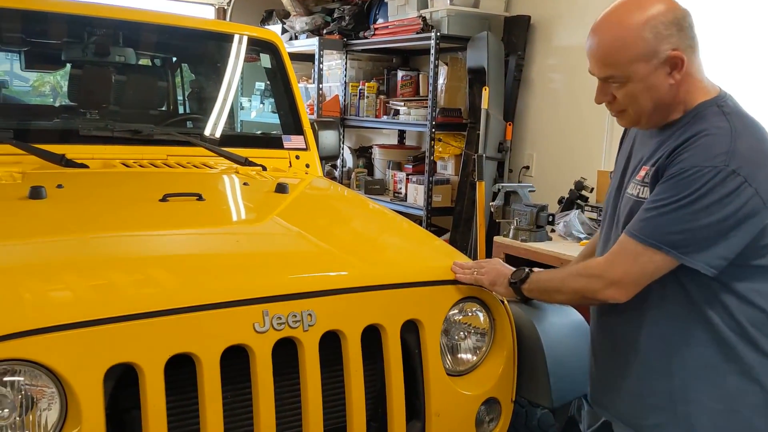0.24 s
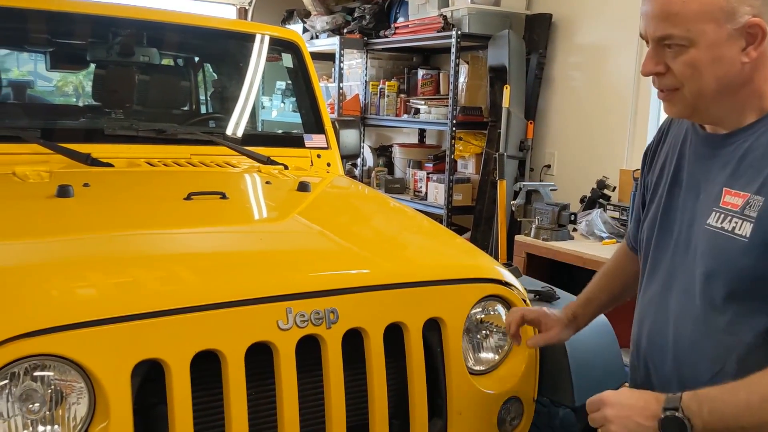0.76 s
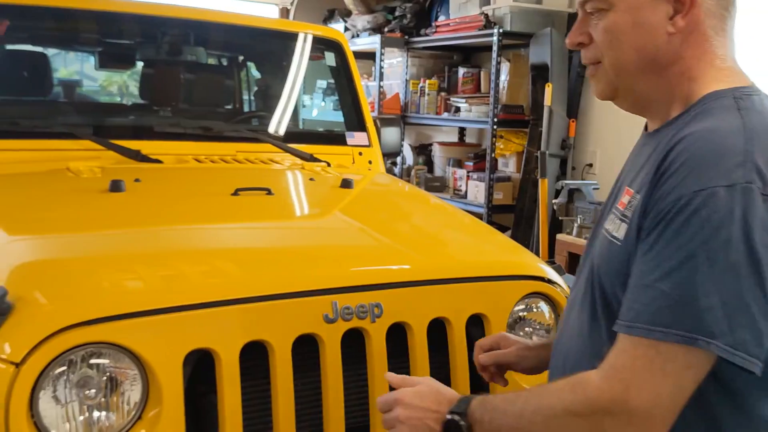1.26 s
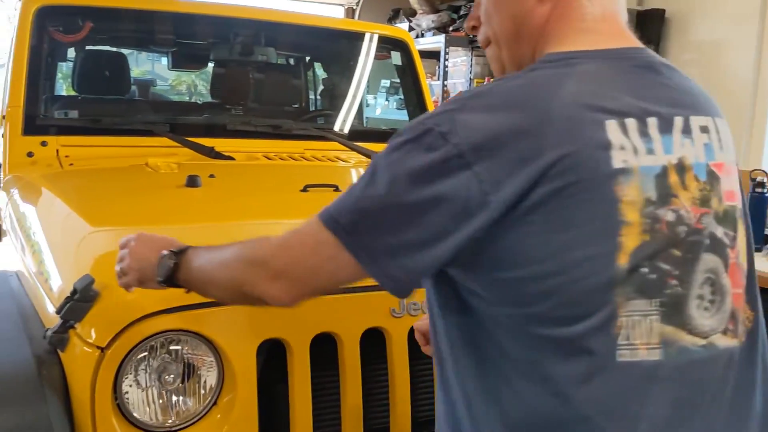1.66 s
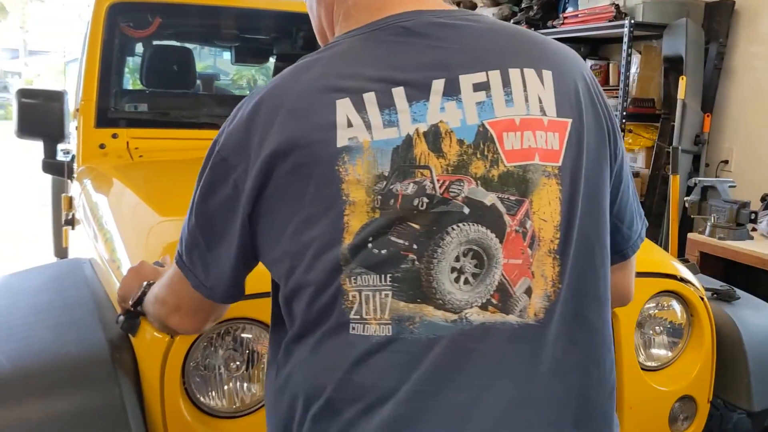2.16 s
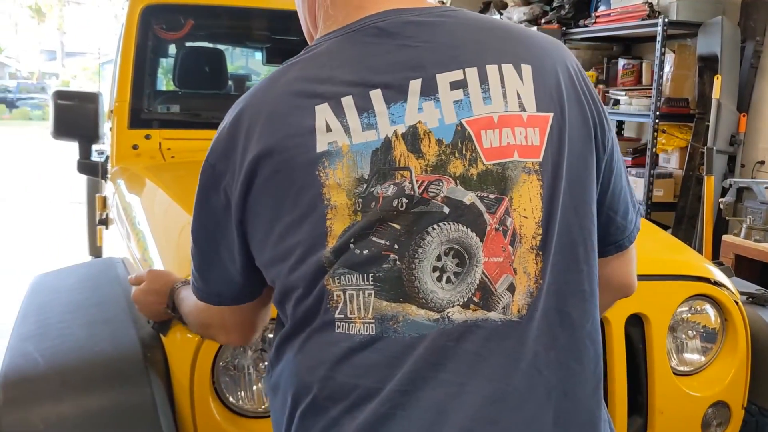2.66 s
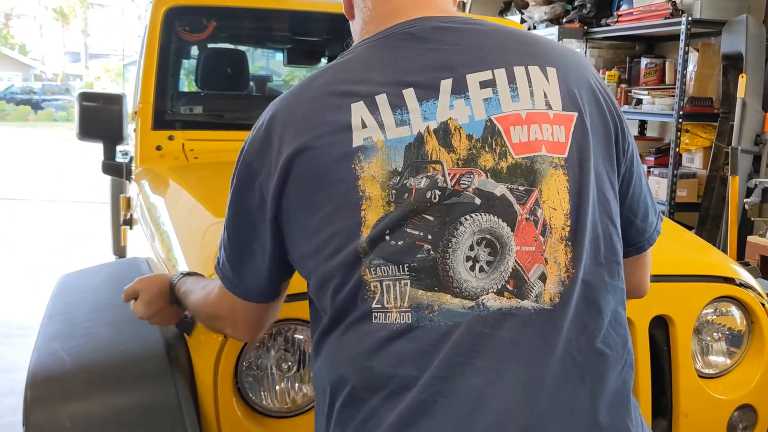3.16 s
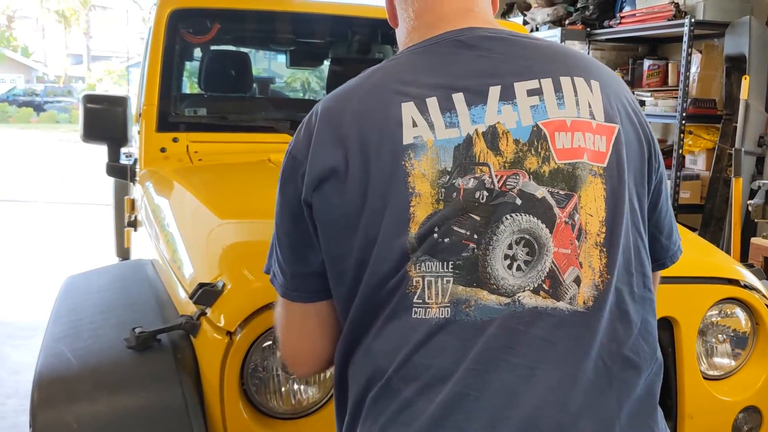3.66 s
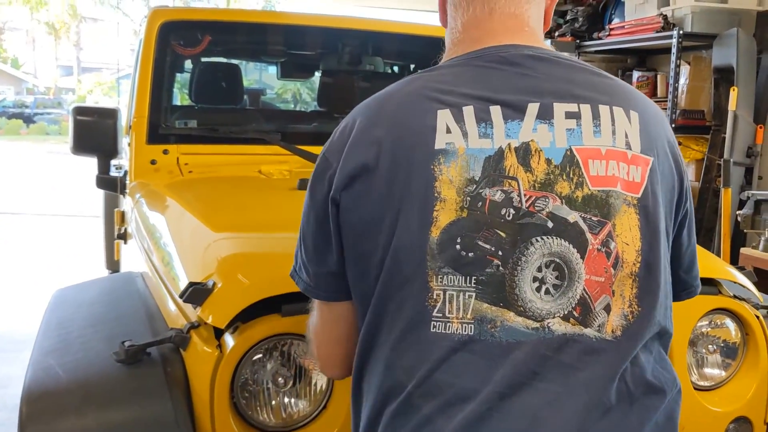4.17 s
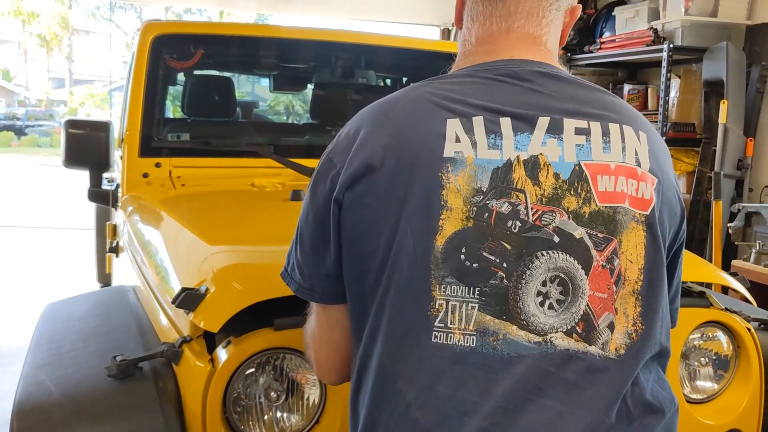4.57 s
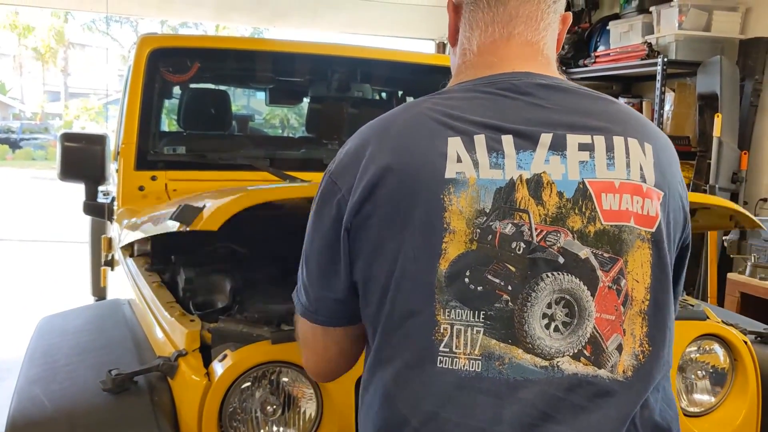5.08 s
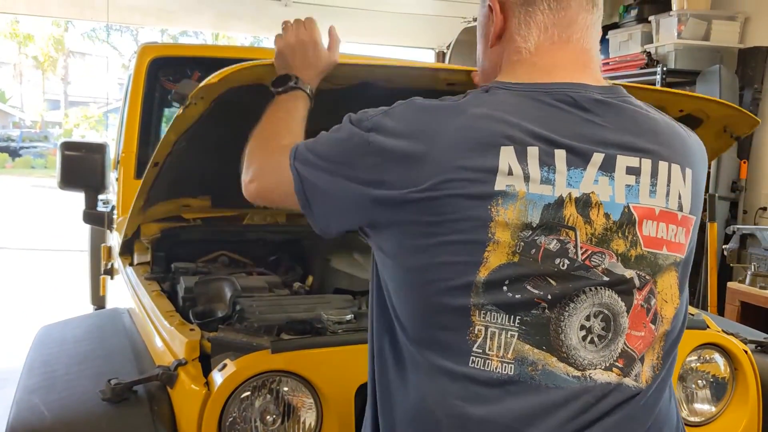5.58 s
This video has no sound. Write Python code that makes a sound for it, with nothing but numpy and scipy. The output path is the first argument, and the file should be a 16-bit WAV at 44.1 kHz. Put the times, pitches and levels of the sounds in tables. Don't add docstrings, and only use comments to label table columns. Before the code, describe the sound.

Latches clack and knock on a hollow sheet-metal car hood in an open garage, then the panel lifts with a brief hum and light clicks.

```python
import sys
import numpy as np
from scipy import signal
from scipy.fft import rfft, irfft, next_fast_len
from scipy.io import wavfile
from scipy.ndimage import uniform_filter1d, map_coordinates

SR = 44100
rng = np.random.default_rng(int(sys.argv[2]) if len(sys.argv) > 2 else 0)


def gain_from_db(level_db):
    decades = np.asarray(level_db, float) / 20
    return 10 ** decades


def digitize_waveform(pressure):
    field = np.atleast_2d(pressure).T
    bounded = np.clip(field, -1, 1)
    quanta = np.round(bounded * 32767).astype(np.int16)
    wavfile.write(sys.argv[1], SR, quanta)


N = 257041
NOW = np.arange(N) / SR
SPAN = np.arange(SR // 3) / SR
GRID = np.fft.rfftfreq(16384, 1 / SR)


def unit(x):
    return x / np.sqrt(np.mean(x ** 2) + 1e-20)


def along(points, hz):
    f, v = np.transpose(points)
    return np.interp(np.log(hz + 1), np.log(f + 1), v)


def level_curve(points):
    s, db = np.transpose(points)
    return np.interp(NOW, s, db)


def wobble(rate):
    knots = rng.standard_normal(int(N * rate / SR) + 4)
    coarse = np.arange(0, N + 64, 64)
    curve = map_coordinates(knots, [coarse * rate / SR], mode="nearest")
    return np.interp(np.arange(N), coarse, curve)


def filtered(x, response):
    m = next_fast_len(len(x) + 8192)
    return irfft(rfft(x, m) * response(np.fft.rfftfreq(m, 1 / SR)), m)[:len(x)]


def rush(spectrum, patchy_db):
    z = signal.stft(rng.standard_normal(N), nperseg=512)[2]
    field = uniform_filter1d(rng.standard_normal(z.shape), size=6, axis=0)
    field = uniform_filter1d(field, size=12, axis=1)
    x = signal.istft(z * gain_from_db(patchy_db * unit(field)), nperseg=512)[1][:N]
    below, above = (spectrum[0][0] / 2, -60), (spectrum[-1][0] * 2, -60)
    closed = [below] + list(spectrum) + [above]
    return unit(filtered(x, lambda hz: gain_from_db(along(closed, hz))))


def add(track, s, x):
    part = track[max(round(s * SR), 0):][:len(x)]
    part += x[:len(part)]


# (frequency [Hz], level [dB per Hz])
PORT_HISS_SPECTRUM = [(600, 17.5), (1500, 3), (2500, 3), (4500, -2.5), (6000, -9), (10000, -11.5),
                      (13000, -32), (16000, -25)]


def microphone_noise():
    whine = gain_from_db(-77 + wobble(3.3)) * np.sin(2 * np.pi * 4468 * NOW)
    return whine + gain_from_db(-63) * rush(PORT_HISS_SPECTRUM, patchy_db=-1.5)


# (frequency [Hz], level [dB rms])
HUM_LINES = [(59.5, -46), (119.5, -53.5), (13404, -80)]


def mains_hum():
    hum = np.zeros(N)
    for hz, db in HUM_LINES:
        hum += gain_from_db(db + 3 + 1.5 * wobble(8)) * np.sin(2 * np.pi * hz * NOW + wobble(8))
    return hum


# (time [s], level [dB])
RUMBLE_LEVEL = [(0.0, -46), (0.32, -49.5), (0.8, -42), (0.96, -46.5), (1.51, -46), (2.13, -47.5),
                (2.84, -43.5), (3.21, -40), (3.56, -45.5), (3.83, -46.5), (4.33, -45.5), (4.82, -47.5),
                (5.19, -42.5), (5.5, -48.5), (5.83, -42.5)]
# (frequency [Hz], level [dB per Hz])
RUMBLE_SPECTRUM = [(12, -50), (20, -5), (65, 2.5), (157, -8), (176, -16), (211, -18), (250, -37),
                   (320, -70), (550, -120)]
# (time [s], level [dB])
STREET_LEVEL = [(0.0, -59.5), (0.53, -54.5), (0.9, -59), (2.13, -58.5), (2.39, -55), (2.84, -61),
                (3.21, -52), (3.36, -60.5), (3.83, -53), (4.09, -52), (4.33, -57.5), (4.82, -53.5),
                (5.19, -57.5), (5.83, -59.5)]
# (frequency [Hz], level [dB per Hz])
STREET_SPECTRUM = [(110, -3), (180, -4), (295, -7), (337, -8), (372, -9.5), (541, -11.5), (1040, -11.5),
                   (1680, -20), (2500, -27.5), (3250, -74), (5500, -120)]
# (frequency [Hz], level [dB per Hz])
AIR_SPECTRUM = [(1060, -26), (1800, 3), (2100, -28), (2220, -4), (3060, -1), (3410, -4.5), (4410, -5),
                (4790, -8.5), (7630, -14), (13800, -12), (16000, -17)]


def outdoors():
    rumble_db, street_db = level_curve(RUMBLE_LEVEL), level_curve(STREET_LEVEL)
    air_db = -68.5 + 0.3 * (street_db - street_db.mean())
    rumble = gain_from_db(rumble_db + 6.5 + 2.74 * wobble(3.18)) * rush(RUMBLE_SPECTRUM, patchy_db=-0.5)
    street = gain_from_db(street_db + 10.5) * rush(STREET_SPECTRUM, patchy_db=1.5)
    air = gain_from_db(air_db + 7) * rush(AIR_SPECTRUM, patchy_db=0.5)
    return rumble + street + air


# (time [s], peak level [dB], frequency [Hz])
FINGER_BUMPS = [
    (.9455, -23, 60),
    (1.7858, -5.5, 97),
    (1.8015, -20.5, 94),
    (2.678, -12, 73),
    (0.18, -36, 65),
    (5.8, -32, 91),
]
# (time [s], level [dB], decay [s])
CASE_TAP = (1.7686, -15, .008)


def fingers():
    skin = rush([(25, 9), (50, -31.5), (90, -18), (150, -13.5)], patchy_db=-5.0)
    out = gain_from_db(-42 + 1.5 * wobble(3.4)) * skin
    for s, db, hz in FINGER_BUMPS:
        cycles = (NOW - s) * hz
        out += gain_from_db(db) * np.exp(-(cycles / 0.6) ** 2) * np.cos(2 * np.pi * cycles + 0.4)
    s, db, decay = CASE_TAP
    t = np.arange(1, SR // 20) / SR
    envelope = (1 - np.exp(-(t / 0.0014) ** 3)) * np.exp(-t / decay)
    falling = np.cos(2 * np.pi * np.log2(t / 0.003))
    add(out, s, gain_from_db(db + 6) * envelope * falling)
    return out


# (start [s], length [s], frequency [Hz], level [dB])
PANEL_RINGS = [
    (3.956, 0.36, 371.3, -36),
    (4.047, 0.31, 438, -39.5),
    (4.1, 0.33, 651, -42.5),
    (4.097, 0.16, 550, -54),
    (4.936, 0.34, 288, -42.5),
    (5.316, 0.34, 286.6, -46),
]


def rings():
    out = np.zeros(N)
    for s, length, hz, db in PANEL_RINGS:
        u = np.clip((NOW - s) / length, 0, 1)
        level = gain_from_db(db + 3.5 * wobble(30) - 3.6 * u) * np.sin(np.pi * u) ** 0.7
        out += level * np.sin(2 * np.pi * hz * NOW + 1.4 * wobble(18))
    return out


# (time [s], peak level [dB], frequency [Hz], t60 [s])
HOOD_THUDS = [(0.0, -21, 96, 0.1), (0.314, -34, 97, 0.16), (0.647, -29.5, 75.5, 0.2), (0.68, -33, 195, 0.3),
              (2.248, -32, 74.6, 0.31), (2.539, -17, 92.7, 0.14), (2.786, -22, 65.6, 0.32),
              (3.211, -21, 85.8, 0.28), (3.568, -24, 156.6, 0.52), (3.611, -20.5, 79.3, 0.27),
              (3.61, -22, 255, 0.33), (3.891, -32, 76, 0.16), (3.93, -33, 200, .2), (5.021, -22, 79, 0.19),
              (5.04, -38, 200, .3)]


def thuds():
    out, t = np.zeros(N), np.arange(SR // 2) / SR
    for s, db, hz, t60 in HOOD_THUDS:
        upper = np.sin(2 * np.pi * 1.37 * hz * t + rng.uniform(0, 2 * np.pi))
        pair = np.sin(2 * np.pi * hz * t) + 0.67 * upper
        add(out, s, gain_from_db(db + 6 - 60 * t / t60) * (1 - np.exp(-t / 0.0085)) * pair)
    return out


def swell(contact):
    u = SPAN / (2 * contact)
    return (u * np.exp(1 - u)) ** 2


def garage(force, t60, build, wet_db, knee_s):
    t = SPAN[::8]
    knee_drop_db = np.minimum(6 * (t / knee_s) ** 3, 7)
    tail = gain_from_db(2 * (-60 * t / t60 - knee_drop_db)) * (1 - np.exp(-t / build)) ** 2
    tail *= gain_from_db(2 * wet_db) / tail.sum()
    tail[0] += 1
    power = signal.fftconvolve(np.interp(t, SPAN, force) ** 2, tail)[:len(t)]
    return np.interp(SPAN, t, np.sqrt(np.abs(power)))


def chatter(depth_db):
    knots = rng.standard_normal(len(SPAN) // 150 + 2)
    gain = np.interp(np.arange(len(SPAN)) / 150, np.arange(len(knots)), knots)
    return gain_from_db(depth_db * gain * np.minimum(SPAN / 0.006, 1))


def shaken(envelope, response):
    noise = envelope * rng.standard_normal(len(SPAN))
    ring = irfft(rfft(noise, 2 * len(GRID) - 2) * response)[:len(SPAN)]
    return ring / np.sqrt(uniform_filter1d(ring ** 2, size=700).max())


# (frequency [Hz], width [Hz], boost [dB])
BODY_MODES = [(245, 21, 5), (325.4, 24, 10), (430, 32, 4.5), (457, 39, 5.5), (556, 56, 4), (847, 90, 1.5),
              (960, 88, 3), (1060, 29, -1.5), (1310, 100, 1), (1955, 155, 2.5), (2420, 40, 0.5),
              (2610, 460, 1), (3440, 280, 3.5), (4110, 1360, 9), (7200, 810, 11), (9030, 360, 6.5)]


def body(scatter_db):
    c, w, db = np.transpose(BODY_MODES)[:, :, None]
    gains = gain_from_db(db + scatter_db * rng.standard_normal(db.shape))
    peaks = 1j * GRID * w / (c * c - GRID ** 2 + 1j * GRID * w)
    return np.prod(1 + (gains - 1) * peaks, axis=0)


# (centre frequency [Hz], echo t60 [s], build-up [s])
BANDS = [
    (347, 0.39, 0.0058),
    (965, 0.3, 0.0084),
    (2020, 0.3, 0.00092),
    (3850, 0.31, 0.00033),
    (7700, 0.28, 0.00086),
]
# (frequency [Hz], level [dB])
CONTACT_REACH = [(120, -5), (230, 15.5), (8000, -6), (11500, 0), (13000, -7), (16000, -9.5)]


def share(k):
    marks = [(band[0], float(j == k)) for j, band in enumerate(BANDS)]
    return np.sin(np.pi / 2 * along(marks, GRID)) * gain_from_db(along(CONTACT_REACH, GRID))


def tilted(db, tilt_db, first, last, pivot_hz):
    return [db + tilt_db * np.log2(band[0] / pivot_hz) for band in BANDS[first:last]]


def contacts(rows, first, wet_db, trim_db):
    out, shares = np.zeros(N), [share(k) for k in range(len(BANDS))]
    for s, force, levels_db in rows:
        response, loose = body(scatter_db=2.5), chatter(depth_db=1.8)
        for i, db in enumerate(levels_db):
            _, t60, build = BANDS[first + i]
            envelope = loose * garage(force, t60, build, wet_db[first + i], knee_s=0.2)
            add(out, s, gain_from_db(db + trim_db[first + i]) * shaken(envelope, response * shares[first + i]))
    return out


# (time [s], level [dB], tilt [dB per octave], contact time [s])
SLIDES = [(.85, -60.5, 2.2, .016), (1.262, -55, 1.5, .02), (1.545, -62, -6, 0.0097),
          (1.885, -55.5, 1.5, 0.016), (2.005, -50.5, 1.5, .022), (2.1, -58.5, -0.5, .011),
          (2.234, -59, 0.7, 0.018), (3.2, -46.5, -8, 0.0078), (3.769, -70, -11, .0088),
          (3.89, -38.5, -11, 0.0052), (4.05, -43.5, -3, 0.0034), (4.67, -53, -6.5, 0.015),
          (5.52, -63, .1, 0.0057), (5.64, -61.5, 5, 0.0017)]


def scuffs():
    rows = [(s, swell(contact), tilted(db, tilt, first=1, last=5, pivot_hz=2700))
            for s, db, tilt, contact in SLIDES]
    return contacts(rows, first=1, wet_db=(4, 2.9, 2.3, 1.1, 1.1), trim_db=(4, 1.4, 1.9, 2.1, 0.9))


# (time [s], level [dB], tilt [dB per octave], contact time [s])
PUSHES = [
    (.565, -57, -4, .0028),
    (2.04, -56, -5.5, .016),
    (2.23, -57, -7.5, 0.0079),
    (2.525, -44.5, -8.5, 0.0037),
    (3.036, -45.5, -9, 0.003),
    (3.058, -47, -10.5, 0.0069),
    (4.76, -52.5, -6, .01),
    (5.39, -63.5, -9, 0.0065),
]


def shoves():
    rows = [(s, swell(contact), tilted(db, tilt, first=0, last=4, pivot_hz=1300))
            for s, db, tilt, contact in PUSHES]
    return contacts(rows, first=0, wet_db=(2.1, 1.6, 2.8, 2.7), trim_db=(1.1, 2.1, 1.9, 1.1))


def resonance(s, hz, width, db, contact, wet_db):
    out = np.zeros(N)
    t60 = along([band[:2] for band in BANDS], hz)
    peak = 1j * GRID * 1.5 * width / (hz * hz - GRID ** 2 + 1j * GRID * 1.4 * width)
    envelope = garage(swell(contact), t60, 0.0013, wet_db, knee_s=0.095)
    add(out, s, gain_from_db(db) * shaken(envelope, peak ** 2))
    return out


# (time [s], frequency [Hz], level [dB])
RUBBED_MODES = [(1.55, 1850, -50.5), (3.58, 730, -26), (3.55, 3100, -30), (3.56, 2250, -25),
                (3.64, 2500, -43), (3.64, 290, -24), (3.62, 1080, -28), (4.045, 1450, -34),
                (3.89, 560, -31), (3.78, 1940, -59), (4.639, 960, -45), (4.68, 7200, -61),
                (4.72, 3670, -57.5), (4.855, 2150, -44), (2.768, 3700, -40), (2.77, 2100, -36),
                (3.185, 3900, -44), (4.64, 3500, -46), (2.05, 420, -46), (2.345, 430, -44),
                (4.86, 1650, -50), (4.68, 430, -42), (4.855, 3000, -56), (5.735, 2400, -50),
                (5.735, 1450, -50), (3.045, 730, -30), (5.519, 4150, -57.5)]


def rubbed():
    return sum(resonance(s, hz, width=0.2 * hz, db=db, contact=0.0105, wet_db=3) for s, hz, db in RUBBED_MODES)


# (time [s], frequency [Hz], level [dB], echo level [dB])
STRUCK_MODES = [(.3, 326, -21, -6.5), (.3, 1055, -25, 6), (.299, 1930, -24, -1.5), (0.34, 2710, -40, 4),
                (.624, 1037, -20.5, 21), (.624, 2670, -26, -6), (.6232, 1840, -22, -4),
                (.626, 800, -23.5, 10.5), (1.306, 3500, -40, -9), (2.775, 351, -19.5, -3),
                (2.775, 974, -28.5, 9), (3.04, 559, -20.5, 4), (3.041, 950, -33, 8),
                (3.195, 432, -24.5, 15), (3.553, 520, -17, -6), (3.552, 997, -20.5, -10),
                (3.552, 4280, -25.5, -9), (3.89, 1500, -29.5, 8), (4.051, 1700, -36.5, 8),
                (3.888, 391, -22.5, 15), (3.887, 3460, -32.5, -3), (4.051, 1153, -27.5, 9),
                (4.05, 4400, -42, 7), (4.637, 4100, -39.5, -6), (4.637, 2900, -40, 3), (4.64, 1400, -44, 8),
                (5.0, 580, -42, 5), (.6235, 1150, -21.5, -10.5), (.2985, 3600, -33, -12),
                (5.163, 4260, -55, 1), (5.638, 5300, -51, -3)]


def struck():
    return sum(resonance(s, hz, width=45 + 0.075 * hz, db=db, contact=3 / hz, wet_db=wet_db)
               for s, hz, db, wet_db in STRUCK_MODES)


# (time [s], panel knock [dB], latch [dB], hardness as tilt [dB per octave])
LATCH_HITS = [(0.0, -25.5, -50.5, -4.5), (0.253, -29.5, -51.5, -5), (0.2985, -24, -31.5, -7.5),
              (0.56, -28, -55.5, -11.5), (0.6235, -19, -30.5, -6.5), (1.307, -46, -50, 1.1),
              (1.461, -50, -56, -3), (1.883, -47, -52.5, 4.5), (2.335, -31, -48.5, -3),
              (2.51, -30, -42, -4), (2.772, -16, -35.5, -8), (3.189, -9, -39, -8), (3.266, -46, -46, 3.5),
              (3.552, -8, -19, -4.5), (3.884, -16, -31.5, -2.5), (4.046, -38, -41, -5.5),
              (4.636, -67, -44, -5), (4.989, -30, -52.5, -3), (5.162, -49, -61, -0.5),
              (5.631, -52, -58.5, 2), (5.733, -43, -51, -2.5)]


def hits():
    force = np.exp(-SPAN / 0.0015)
    rows = [(s, force, [knock] + tilted(db, tilt, first=1, last=5, pivot_hz=2700))
            for s, knock, db, tilt in LATCH_HITS]
    return contacts(rows, first=0, wet_db=(16.7, 15.8, 13.0, 5.0, 8.1), trim_db=(-8.5, 3.5, 3, 0.8, -0.8))


# (frequency [Hz], width [Hz], level [dB], lag [samples], leak level [dB])
HAND_CAVITY = (585, 423, -6.5, 6, -31)
# (frequency [Hz], level [dB])
HAND_LEAK = [(150, 9), (300, 10), (600, 7), (1200, 16), (2200, 11), (4500, -5.5), (6000, -42), (15000, -32)]


def covered(x):
    hz, width, db, lag, leak_db = HAND_CAVITY

    def cavity(f):
        late = np.exp(-2j * np.pi * f * lag / SR)
        return gain_from_db(db) * hz * hz / (hz * hz - f * f + 1j * f * width) * late

    z = signal.stft(filtered(x, lambda f: gain_from_db(along(HAND_LEAK, f))), nperseg=256)[2]
    shifting = np.exp(2j * np.pi * rng.random(z.shape))
    leak = signal.istft(z * shifting, nperseg=256)[1][:N]
    return filtered(x, cavity) + gain_from_db(leak_db) * leak


def scene():
    air = outdoors() + mains_hum() + rings() + thuds()
    air += scuffs() + shoves() + rubbed() + struck() + hits()
    left = covered(air) + fingers() + microphone_noise()
    return np.array([left, air])


def roll_off(x):
    return signal.sosfilt(signal.butter(12, 16420, fs=SR, output="sos"), x)


def record(dry):
    held = dry / (1 + np.abs(dry / 0.98) ** 6) ** (1 / 6)
    held = np.array([filtered(side, lambda f: f < 15850) for side in held])
    return roll_off(held)


dry = scene()
out = record(dry)
digitize_waveform(out)
```